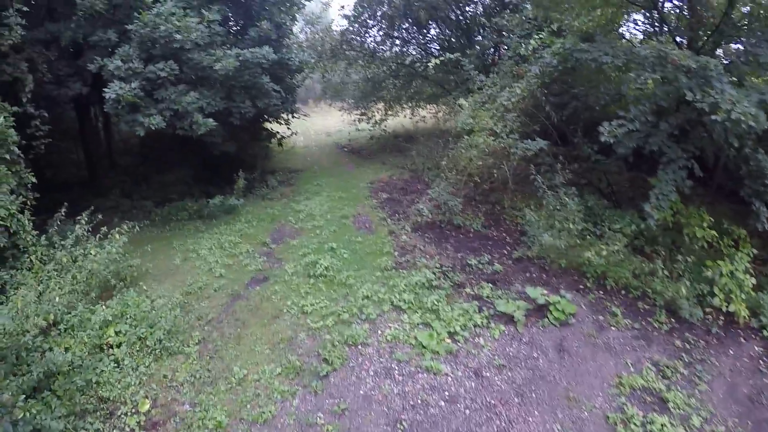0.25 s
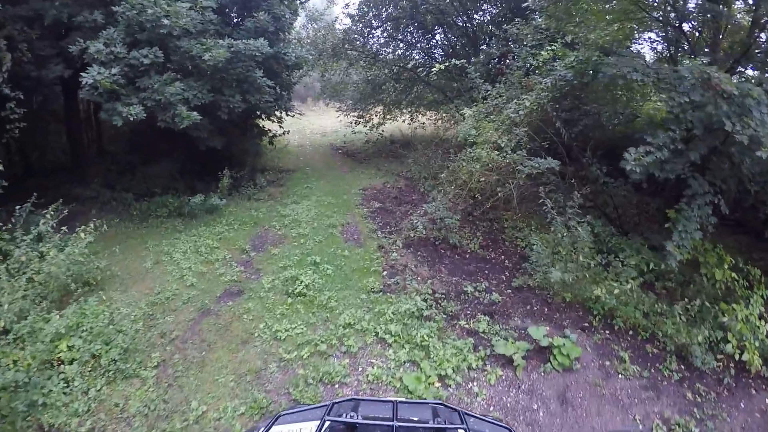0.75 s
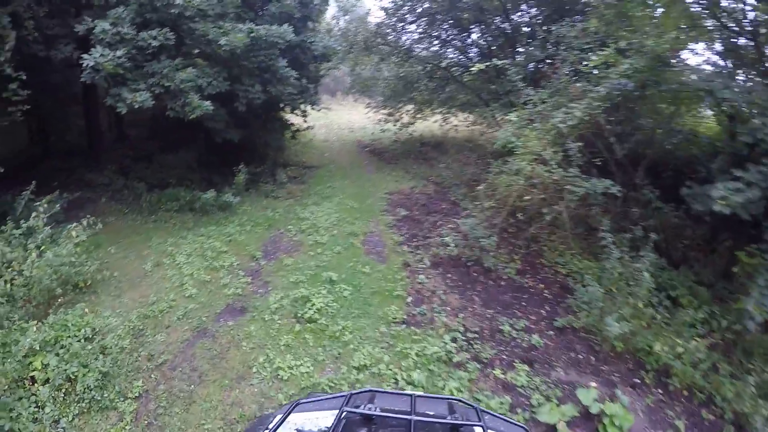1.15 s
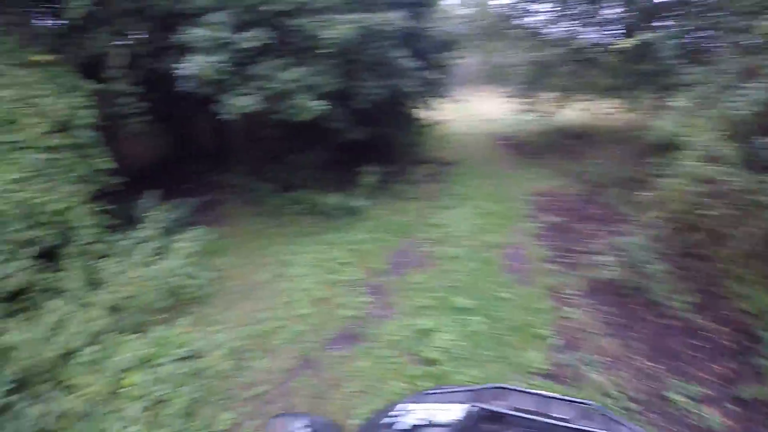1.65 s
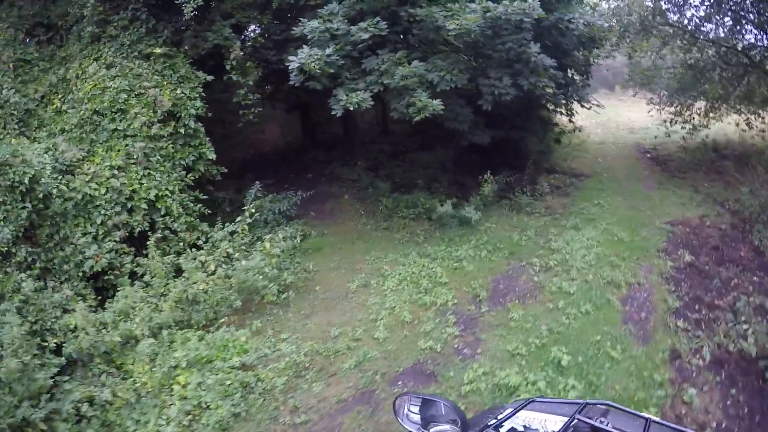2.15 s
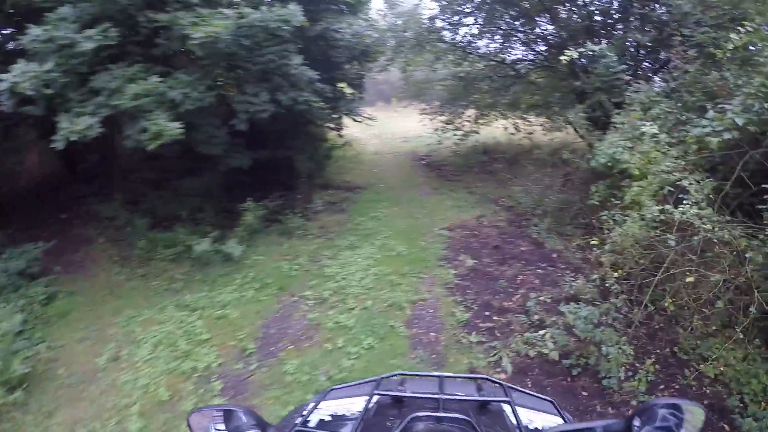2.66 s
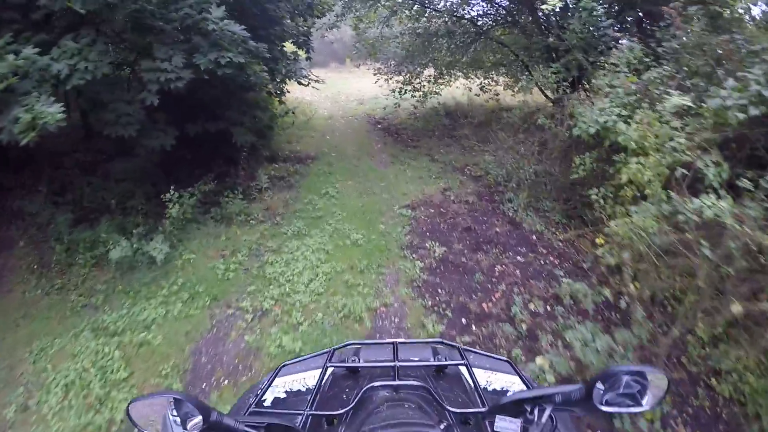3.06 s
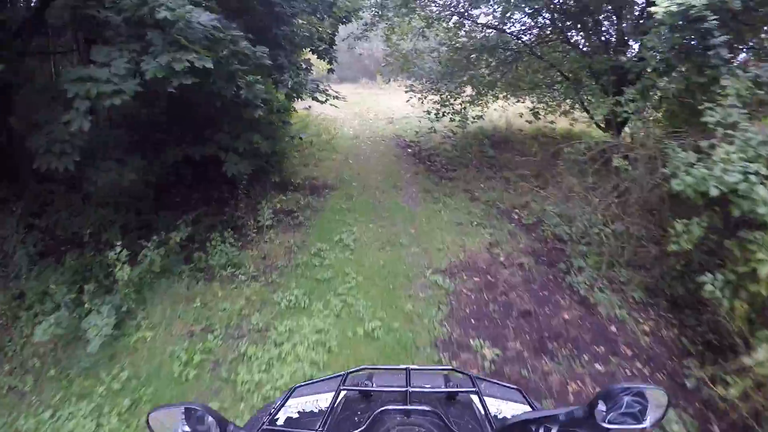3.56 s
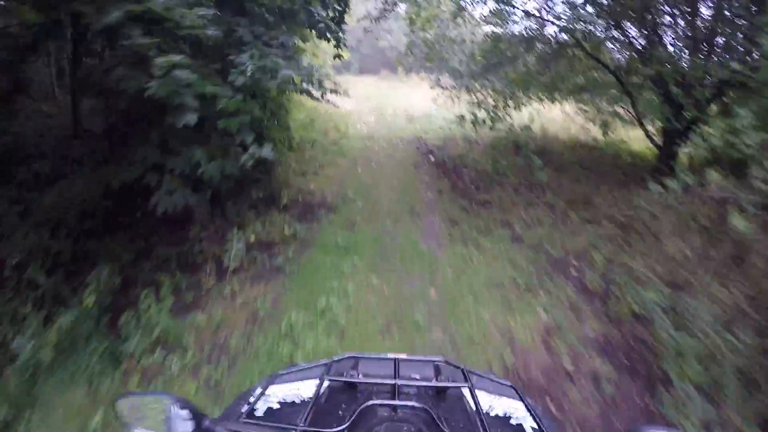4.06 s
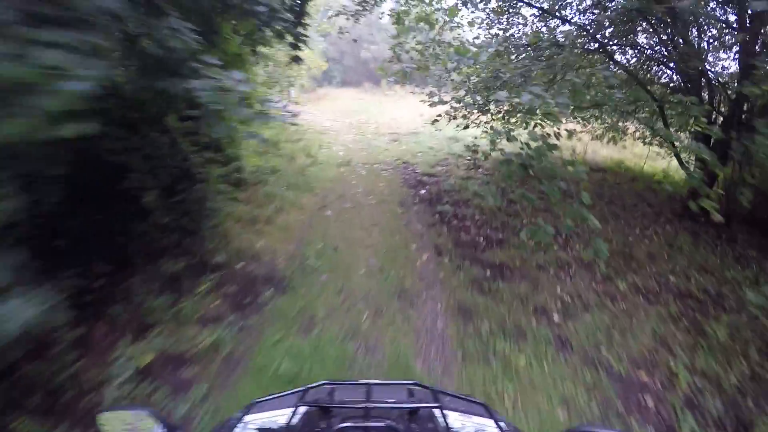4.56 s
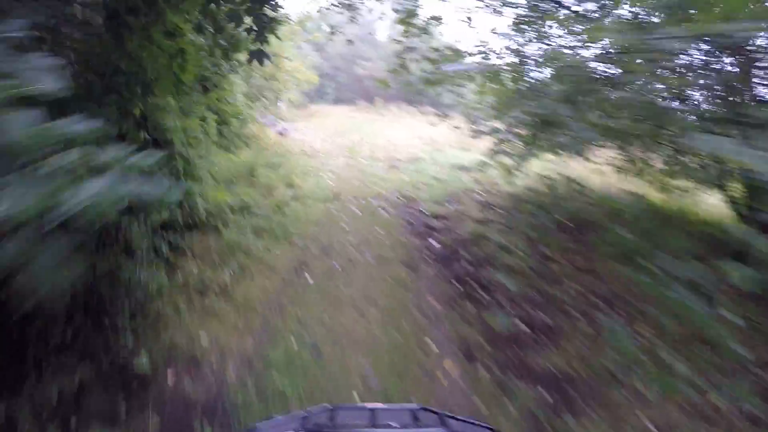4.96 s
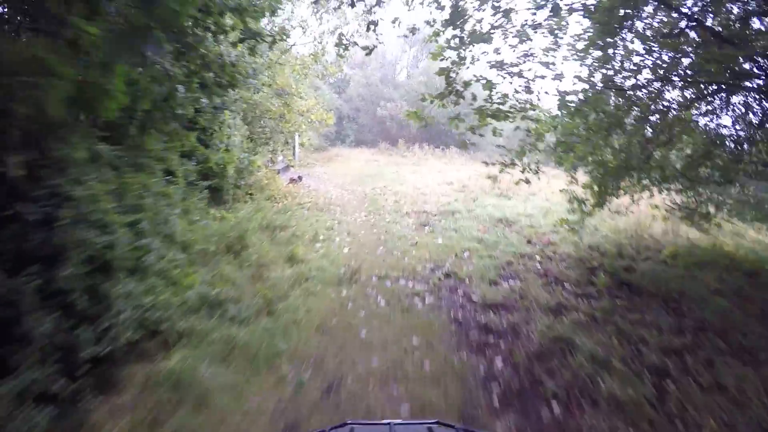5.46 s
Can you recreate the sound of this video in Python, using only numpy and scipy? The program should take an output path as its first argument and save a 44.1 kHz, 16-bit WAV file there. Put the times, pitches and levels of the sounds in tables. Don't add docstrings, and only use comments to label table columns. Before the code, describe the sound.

Puttering four-stroke quad engine idles, revs up and holds a steady drone, with leaf ticks and one hard double knock on the casing.

```python
import sys
import numpy as np
from scipy import signal
from scipy.fft import rfft, irfft
from scipy.io import wavfile
from scipy.ndimage import uniform_filter1d

SR = 44100
rng = np.random.default_rng(int(sys.argv[2]) if len(sys.argv) > 2 else 0)


def transcribe(signal):
    frames = np.atleast_2d(signal).T
    limited = np.clip(frames, -1, 1)
    pcm = np.round(limited * 32767).astype(np.int16)
    wavfile.write(sys.argv[1], SR, pcm)


def decibels_to_gain(level_db):
    exponent = np.asarray(level_db, float) / 20
    return 10 ** exponent


N = 251370


def track(table):
    return np.interp(np.arange(N) / SR, *np.array(table).T)


def unit(x):
    return x / np.sqrt(np.mean(x ** 2))


def steady(x, span_s):
    return x / np.sqrt(uniform_filter1d(x ** 2, int(span_s * SR)) + 1e-12)


def band(x, hz, width):
    return signal.lfilter(*signal.iirpeak(min(hz, .45 * SR), max(hz / width, .3), fs=SR), x)


def ring(x, modes):
    return sum((-1) ** k * decibels_to_gain(db) * band(x, hz, width) for k, (hz, width, db) in enumerate(modes))


def walk(rate):
    hold = int(SR / rate)
    steps = np.repeat(rng.standard_normal(N // hold + 1), hold)
    return 1.3 * uniform_filter1d(uniform_filter1d(steps, hold), hold)[:N]


def add(out, s, sound):
    i = int(s * SR)
    out[i:i + len(sound)] += sound[:N - i]


# (time [s], firing rate [1/s])
REVS = [(0.0, 16.4), (0.08, 15.19), (0.17, 21.12), (0.35, 25.18), (0.57, 24.51), (0.78, 17.6),
        (0.99, 14.84), (1.43, 13.02), (2.01, 12.38), (2.14, 21.23), (2.37, 25.41), (3.16, 31.13),
        (3.56, 28.4), (3.86, 31.99), (4.23, 32.67), (4.62, 32.19), (5.0, 33.48), (5.7, 31.28)]
MAP_SPEEDS = (12.5, 17, 23, 28, 33)


def by_revs(values):
    return np.interp(track(REVS), MAP_SPEEDS, values)


def firings(turn, scatter_db):
    at = np.flatnonzero(np.diff(np.floor(turn)) > 0)
    uneven = np.interp(track(REVS)[at], (13, 27), (2, 1))
    return at, decibels_to_gain(scatter_db * uneven * rng.standard_normal(N // 500)[:len(at)])


def pops(at, size, width_ms):
    out, t = np.zeros(N), np.arange(-600, 600) / SR
    for i, gain in zip(at[at > 600], size[at > 600]):
        u = t * 1000 / width_ms[i] * np.sqrt(gain)
        add(out, i / SR + t[0], -gain * u * np.exp(-u ** 2 / 2))
    return out


# (centre [Hz], width [Hz], level [dB])
PIPE_IDLE = [(156, 26, 2), (221.4, 41, -6.5)]
PIPE_PULL = [(152.8, 7.2, 0), (182.8, 23.7, -0.5)]
BARK = [(294, 35, -7.5), (356, 36, 3.5), (415, 59, -3), (500, 89, -4), (630, 130, -14)]
LOAD = (0.33, 0.75, 1, 1, 1)
HEAT = (.05, .1, .2, .9, .97)
# whole exhaust, then bark, pipe ring, header and roar relative to their parents (level [dB])
EXHAUST_DB = (-45, -43.5, -44.5, -38.5, -38)
BARK_DB = (-18, -16, -10, -18.5, -11.5)
RING_DB = (1, 1.5, 3, 9, 10)
HEADER_DB = (-9.5, -3.5, -3, -10, -14)
ROAR_DB = (1, -6.5, -16, -4.5, -1.5)


def exhaust(turn, at, size):
    load, heat = np.clip([by_revs(LOAD), by_revs(HEAT)], 0, 1)
    pop = pops(at, size, 2.2 - 0.87 * load)
    echo = np.roll(band(pops(at, size, np.full(N, .7)), 172, 150), int(3 * SR / 1000))
    gas = np.exp(-(turn % 1) / 0.64) * rng.standard_normal(N)
    echo = unit(echo) + decibels_to_gain(-21) * unit(gas)
    cool_pipe = unit(ring(echo, PIPE_IDLE))
    hot_pipe = unit(band(ring(echo, PIPE_PULL), 182.3, 37))
    header = unit(band(band(echo, 237, 49), 226.0, 63))
    pipe = (1 - heat) * cool_pipe + heat * hot_pipe + decibels_to_gain(by_revs(HEADER_DB)) * header
    boom = steady(pop, .16) + decibels_to_gain(by_revs(RING_DB)) * steady(pipe, 0.193)
    boom = boom + decibels_to_gain(-15) * unit(band(band(rng.standard_normal(N), 170, 260), 170, 300))
    crack = band(ring(pops(at, size, np.full(N, .3)), BARK), 343, 290)
    roar = band(ring(gas + 0.75 * rng.standard_normal(N), BARK[2:]), 586, 340)
    bark = np.sqrt(.65 + .2 * load) * steady(crack, .16) + decibels_to_gain(by_revs(ROAR_DB)) * unit(roar)
    climb = uniform_filter1d(np.maximum(np.gradient(track(REVS)) * SR, 0), SR // 6)
    surge_db_per_hz_s = 0.0389
    level = decibels_to_gain(by_revs(EXHAUST_DB) + surge_db_per_hz_s * climb)
    return level * (decibels_to_gain(0.5) * steady(boom, 0.099) + decibels_to_gain(by_revs(BARK_DB)) * steady(bark, 0.132))


# (time [s], peak level [dB], length [s])
SWELLS = [(0, -31.5, 0.48), (0.332, -31.5, .3), (0.708, -34, 0.13), (0.876, -32, 0.12), (1.037, -35, 0.6),
          (1.31, -37, 0.28), (1.616, -33, 0.24), (1.903, -40, 0.38), (2.08, -33, 0.29), (2.316, -25, 0.23),
          (2.694, -39, 0.14), (2.85, -40, 0.45), (3.134, -35.5, 0.35), (3.403, -34.5, 0.4),
          (3.787, -34.5, 0.53), (4.1, -32, 1), (4.54, -34, 0.082), (4.68, -34, 0.13), (4.828, -37, .14),
          (5.067, -34, 0.1), (5.204, -38, .1), (5.383, -37.5, 0.46), (5.68, -37, .2)]


def rocking():
    t, smooth_trail_db = np.arange(N) / SR, -43
    power = decibels_to_gain(2 * smooth_trail_db)
    for s, db, length in SWELLS:
        power = power + decibels_to_gain(2 * db) * np.cos(np.pi * np.clip((t - s) / length, -.5, .5)) ** 2
    return np.sqrt(power)


# (centre [Hz], width [Hz], level [dB])
MOUNT = [(27.3, 15.6, -1), (46.6, 7, 2), (66.4, 5.3, -7)]
PISTON_DB = (3.5, 3, 15, -8.5, 0.5)


def mount(turn):
    once, twice, thrice = (ring(np.sin(2 * np.pi * k * turn + lag), MOUNT)
                           for k, lag in ((1, 0.65), (2, 0.88), (3, 2.3)))
    engine = decibels_to_gain(-4.0) * once + decibels_to_gain(by_revs(PISTON_DB)) * twice + decibels_to_gain(-10.5) * thrice
    trail = ring(band(band(rng.standard_normal(N), 38.5, 46), 38.7, 56), MOUNT)
    return rocking() * (steady(engine, 0.13) + decibels_to_gain(-2.0) * steady(trail, 0.11))


# (centre [Hz], width [Hz], level [dB])
CASE = [(488, 6.9, 8), (1086, 15, -1.5), (1733, 320, 0.5), (2200, 380, -5), (3030, 53, -8), (3400, 36, -7),
        (4257, 670, -8), (5025, 120, -10), (6500, 22, -27), (6660, 93, -15.5), (7780, 130, -15.5),
        (10030, 1700, -22.5)]
# (frequency [Hz], density [dB per Hz])
CASE_FLOOR = [(360, -41), (620, -6.5), (749, -3.5), (823, -2), (1730, 2), (2800, -4), (4250, -11.5),
              (6550, -8), (7100, -22), (7900, -21), (8800, -28), (10300, -25.5), (15500, -34)]


def case_colour(x):
    hz = np.maximum(np.fft.rfftfreq(N, 1 / SR), 1)
    floor_hz, floor_db = np.array(CASE_FLOOR).T
    power = decibels_to_gain(2 * (np.interp(np.log(hz), np.log(floor_hz), floor_db, -60, -60) - 6.0))
    for centre, width, db in CASE:
        power = power + decibels_to_gain(2 * db) / (1 + (2 * (hz - centre) / width) ** 2) ** 2
    return irfft(rfft(x) * np.sqrt(power), N)


CLATTER_DB = (-59, -55.5, -52, -47.5, -46.5)
TREBLE_DB = (-7, -7.5, -8, -8, -6.5)


def clatter(turn):
    ticks = rng.standard_normal(N) * decibels_to_gain(0.73 * rng.exponential(size=N // 64 + 1).repeat(64)[:N])
    beat = decibels_to_gain(1.0 * np.cos(4 * np.pi * turn) + 0.92 * np.cos(2 * np.pi * turn + 0.22))
    sound = case_colour(beat * (rng.standard_normal(N) + decibels_to_gain(-12.5) * unit(ticks)))
    treble_db = by_revs(TREBLE_DB) + 7.0
    edges_hz = (300, 900, 1500, 3000, 5000, 7100, 9000, 16000)
    out = 0
    for lo_hz, hi_hz in zip(edges_hz[:-1], edges_hz[1:]):
        part = signal.sosfiltfilt(signal.butter(2, (lo_hz, hi_hz), "band", fs=SR, output="sos"), sound)
        flicker_db = 0.47 * walk(45) + 0.73 * walk(7)
        out = out + part * decibels_to_gain(flicker_db + treble_db * (lo_hz >= 3000))
    return unit(out) * decibels_to_gain(by_revs(CLATTER_DB) + 0.5)


BELT_DB = (-73, -77, -74, -56.5, -60.5)


def belt():
    hiss = band(band(rng.standard_normal(N), 7500, 350), 8120, 450)
    return unit(hiss) * decibels_to_gain(by_revs(BELT_DB) - 7.5 + 1.6 * walk(40))


CLUTCH_DB = (-75, -68, -47, -55.5, -69)


def clutch(turn):
    whine = band(band(rng.standard_normal(N), 1820, 110), 1990, 160)
    return unit(whine) * decibels_to_gain(by_revs(CLUTCH_DB) - 6.5 + 2.2 * np.cos(2 * np.pi * turn + 0.19))


# (time [s], level [dB])
FACING = [(0, -1.5), (.5, 0), (1, 0), (1.6, 1.5), (1.8, -1.5), (2.6, -0.5), (3, 2), (3.4, 2), (3.8, 0.5),
          (4.6, -0.5), (4.95, 1.5), (5.3, -1), (5.7, 0.5)]


def head_turns():
    return decibels_to_gain(track(FACING))


HUM_ORDERS = (8, 12, 16)
HUM = (0, -7, 1)
HUM_DB = (-75, -67, -75, -59.5, -64.5)


def hum(turn):
    tones = sum(decibels_to_gain(db + 1.0 * walk(6)) * np.sin(2 * np.pi * k * turn) for k, db in zip(HUM_ORDERS, HUM))
    return decibels_to_gain(by_revs(HUM_DB)) * tones


# (time [s], peak level [dB], pitch [Hz])
LEAVES = [(1.5274, -52, 6360), (1.5539, -53, 6690), (1.602, -47, 6100), (3.0494, -46, 7790),
          (3.279, -35.5, 5950), (3.2914, -38, 6760), (3.4094, -54, 6560), (3.4386, -46, 7860),
          (3.4644, -46, 7860), (3.5129, -48, 7820), (3.6694, -46, 7700), (3.7207, -43, 6390),
          (4.1814, -41, 5740)]


def leaves():
    out, t = np.zeros(N), np.arange(SR // 50) / SR
    for (s, db, hz), grit in zip(LEAVES, rng.standard_normal((len(LEAVES), len(t)))):
        tick = grit * np.minimum(t / 0.0025, 1) * np.exp(-t / 0.0043)
        tick = band(band(tick, hz, 3000), hz, 4000) + decibels_to_gain(-7.0) * band(band(tick, 14200, 3000), 12700, 4000)
        add(out, s, decibels_to_gain(db) * tick / np.abs(tick).max())
    return out


def misfire():
    at_s, dip_db, length_s = 1.63, -5, 0.057
    return decibels_to_gain(dip_db * np.exp(-((np.arange(N) / SR - at_s) * 2 / length_s) ** 4))


# (frequency [Hz], level [dB], t60 [s])
SHELL = [(1197, -3, 0.032), (1460, 6.5, 0.016), (1812, -10, 0.04), (2450, 2, 0.023), (2614, 1.5, 0.0097)]
# (time [s], peak level [dB], rasp [Hz], low body level [dB], length [ms])
SCRAPES = [(1.6733, -46, 1500, -6, 4.1), (1.7001, -38, 1240, -21, 3.3), (1.8331, -48, 1740, -1, 2.2),
           (2.0728, -41, 2180, -11, 6), (2.2328, -48.5, 1440, 1, 1.5), (3.8571, -9.5, 2240, -42, 5.85),
           (3.9849, -20.5, 1610, -13, 7.4), (3.998, -20, 1060, -13, 6.1), (4.0034, -14, 1050, -6.5, 4.36),
           (4.0205, -19, 3020, -22, 2.8), (4.02, -12.5, 2200, -28, 3.1), (4.027, -25, 1480, -13, 4.1),
           (4.075, -26.5, 1460, -28, 4.5), (4.083, -30, 2100, -26, 2), (4.1016, -32, 1800, -18, 8),
           (4.1096, -25.5, 1900, -3.5, 2.84), (4.1244, -23, 1930, -0.5, 12),
           (4.134, -0.5, 2620, -9.5, 3.125), (4.143, -11.5, 1920, -11, 6), (4.1335, -5, 1060, -12, 2),
           (4.2516, -35, 1150, -15, 6.5), (4.2677, -27.5, 1220, -5.5, 5.8), (4.2761, -12, 1800, -12, 4.05),
           (4.3224, -30.5, 1880, -9, 5.7)]
# (time [s], peak level [dB])
TAPS = [(1.6733, -50), (1.7008, -41), (1.832, -43), (2.234, -39.5), (3.8573, -1.5), (3.999, -29),
        (4.0045, -18.5), (4.018, -34), (4.0547, -34), (4.1242, -31), (4.132, -5.5), (4.141, -33),
        (4.1501, -23), (4.3224, -37)]


def knocks():
    out, t = np.zeros(N), np.arange(SR // 16) / SR
    shell = sum(decibels_to_gain(db) * np.sin(2 * np.pi * hz * t) * 1000 ** (-t / t60) for hz, db, t60 in SHELL)
    shell = shell * np.sin(np.minimum(t / 0.0016, 1) * np.pi / 2) ** 2
    thin = signal.butter(6, 1000, "high", fs=SR, output="sos")
    shell = signal.sosfilt(thin, shell)
    shell = shell / np.abs(shell).max()
    wall = signal.butter(3, (1000, 3200), "band", fs=SR, output="sos")
    for (s, db, hz, low_db, scrape_ms), grit in zip(SCRAPES, rng.standard_normal((len(SCRAPES), len(t)))):
        rise_s = .0004 * scrape_ms
        rasp = grit * np.minimum(t / rise_s, 1) ** 2 * np.exp(-t * 1000 / scrape_ms)
        tone = band(band(band(rasp, hz, 590), hz, 680), hz, 770)
        tone = tone + decibels_to_gain(-12.5) * signal.sosfilt(thin, signal.sosfilt(wall, rasp))
        body = band(band(band(rasp, 600, 370), 486, 560), 500, 720)
        fizz = band(band(band(rasp * np.exp(-t / 0.0055), 4340, 2400), 4300, 2800), 3700, 3500)
        tone, body, fizz = (part / np.abs(part).max() for part in (tone, body, fizz))
        add(out, s - rise_s, decibels_to_gain(db) * (tone + decibels_to_gain(low_db) * body + decibels_to_gain(-16) * fizz))
    for s, db in TAPS:
        add(out, s, decibels_to_gain(db) * shell)
    return out


# (time [s], peak level [dB], pitch [Hz], rise [ms], t60 [s])
PUSHES = [
    (3.1, -23, 20.9, 8, 0.36),
    (3.857, -7, 43.8, 19, 0.91),
    (3.857, -6, 89, 5.9, 0.044),
    (4.133, -16.5, 176.4, 3.5, 0.13),
    (4.135, -12, 353, 3.5, 0.078),
    (4.29, -3.5, 31.2, 14, 0.15),
]
# (time [s], peak level [dB], pitch [Hz], rise [ms], t60 [s])
PULLS = [
    (3.989, -19.5, 45, 6.6, 0.66),
    (4.128, 10.5, 44, 17.6, 0.12),
    (4.151, -7, 42.8, 76, 0.84),
]


def wobbles():
    out, t = np.zeros(N), np.arange(SR // 2) / SR
    for sign, table in ((1, PUSHES), (-1, PULLS)):
        for s, db, hz, rise_ms, t60 in table:
            swing = (1 - np.exp(-t * 1000 / rise_ms)) * 1000 ** (-t / t60) * np.cos(np.pi * t)
            add(out, s, sign * decibels_to_gain(db) * swing * np.sin(2 * np.pi * hz * t))
    return out


def scene():
    turn = 0.021 + np.cumsum(track(REVS)) / SR
    at, size = firings(turn, scatter_db=1.52)
    tail = misfire() * exhaust(turn, at, size)
    gear = head_turns() * (clatter(turn) + belt() + clutch(turn))
    branch = knocks() + wobbles() + leaves()
    return (tail + mount(turn) + gear + hum(turn) + branch)[None]


def roll_off(x):
    return signal.sosfilt(signal.butter(12, 16510, fs=SR, output="sos"), x)


def record(dry):
    hiss_db = -70
    wet = dry + decibels_to_gain(hiss_db) * rng.standard_normal(dry.shape)
    wet = wet / (1 + np.abs(wet / .96) ** 6) ** (1 / 6)
    wet = signal.sosfilt(signal.ellip(8, .2, 30, 15200, fs=SR, output="sos"), wet)
    return roll_off(wet)


dry = scene()
out = record(dry)
transcribe(out)
```